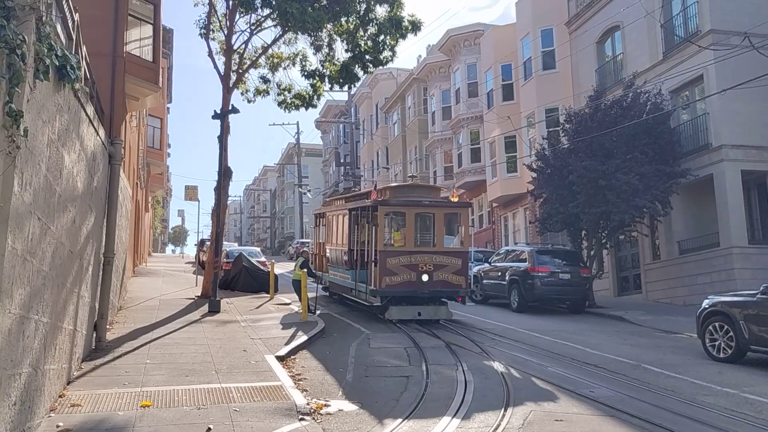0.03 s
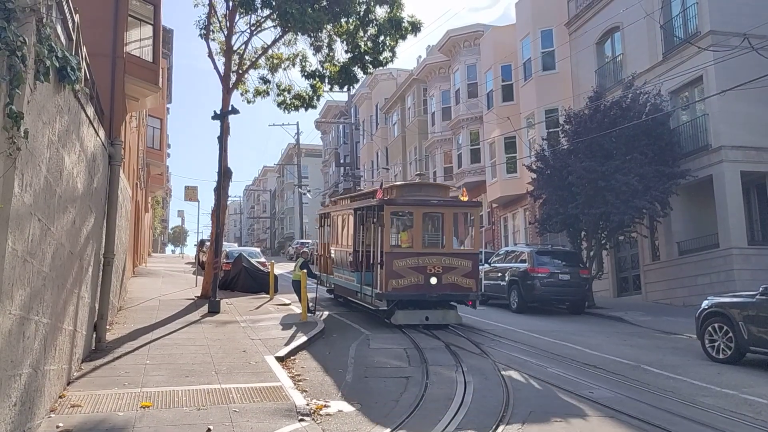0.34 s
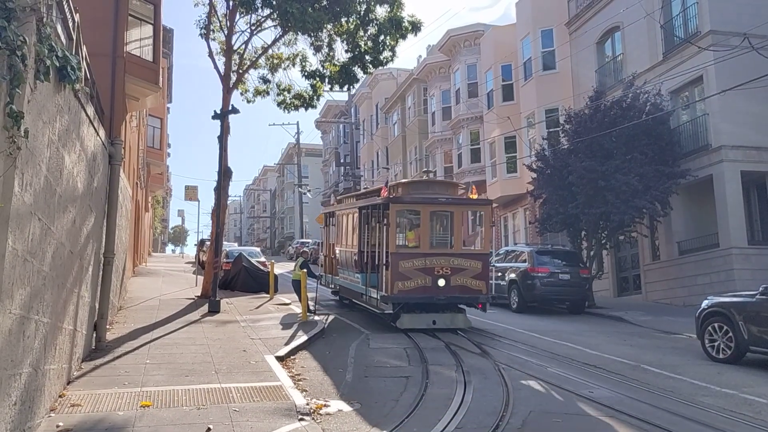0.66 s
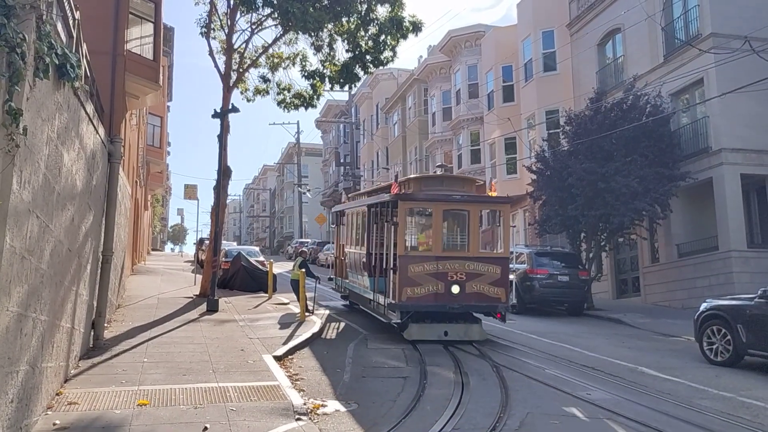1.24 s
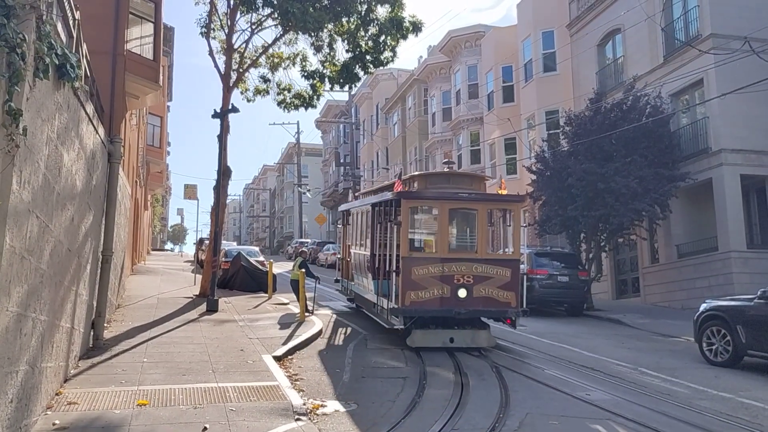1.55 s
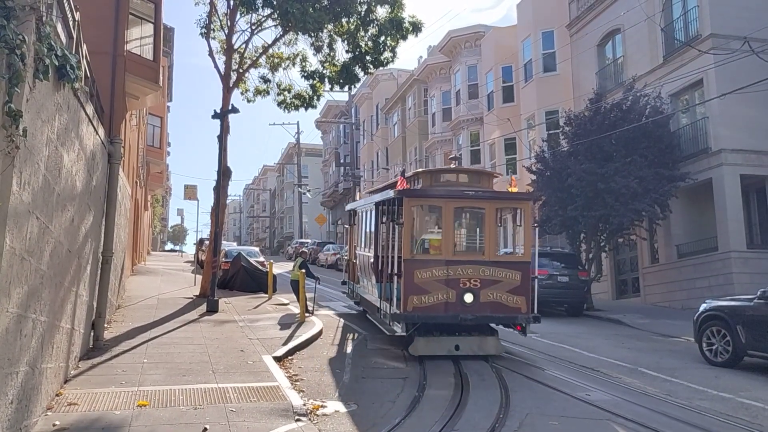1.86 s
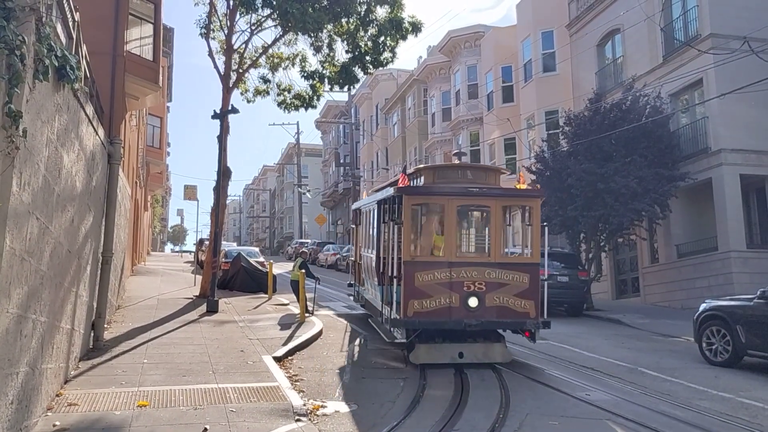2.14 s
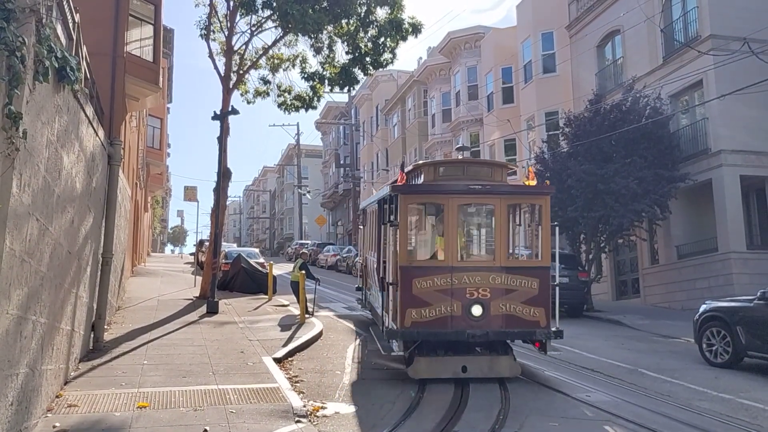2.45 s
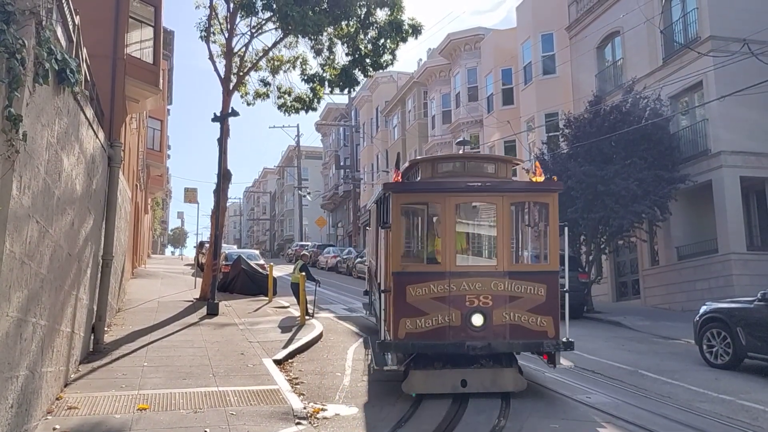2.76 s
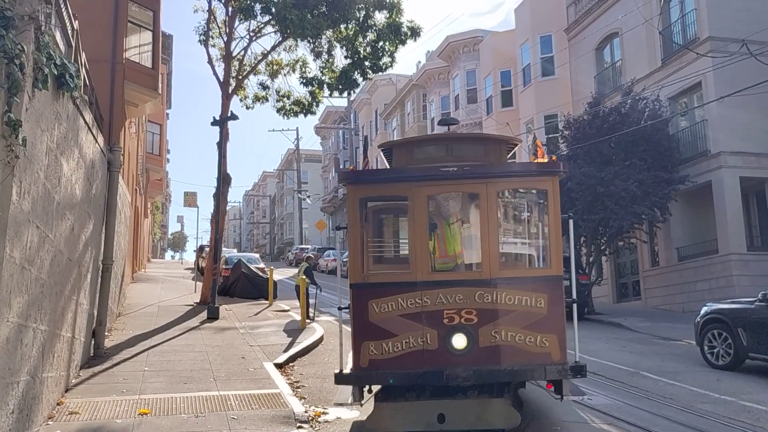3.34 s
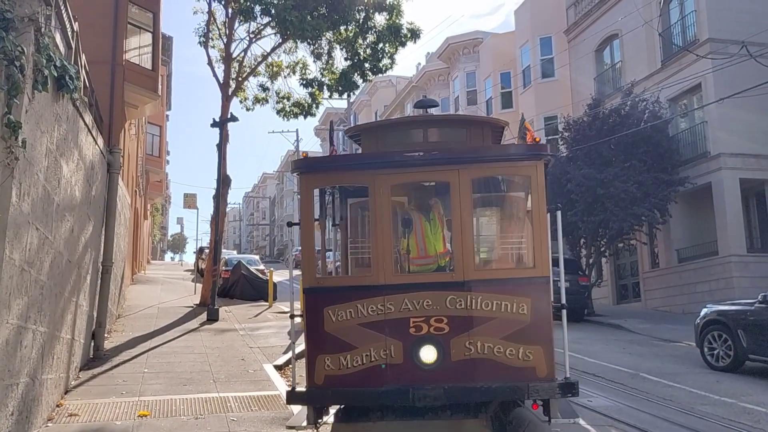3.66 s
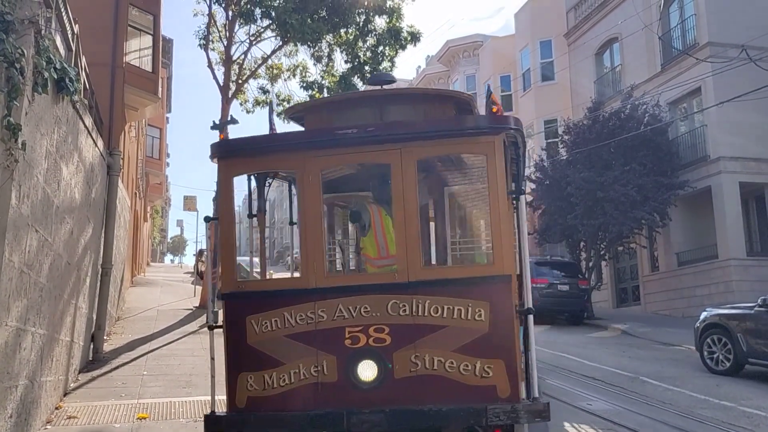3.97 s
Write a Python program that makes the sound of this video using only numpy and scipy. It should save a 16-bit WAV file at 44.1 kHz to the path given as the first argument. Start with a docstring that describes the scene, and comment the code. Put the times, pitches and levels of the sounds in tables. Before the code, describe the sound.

A cable car rolls toward the microphone on a street, over the fast ringing tick of its cable on the right. Dull wheel knocks and a growing rumble follow, with hissing scrape, a thin squeal and a final bright rush.

```python
"""A cable car rolls nearer down a city street while the haul cable runs in its slot just to the right.
At first the cable's strands strike a steel guide sixty times a second and make its modes ring.
From about one second the wheels knock over rail joints, and the car's rumble and roar swell.
After two seconds the striking turns into a steady scrape, the wooden body booms and the guide's
friction squeal grows. Last comes a bright rush of steel as the front wheels draw level."""
import sys
import numpy as np
from scipy import signal
from scipy.fft import rfft, irfft, next_fast_len
from scipy.io import wavfile
from scipy.ndimage import uniform_filter1d, minimum_filter1d, map_coordinates

SR = 44100
rng = np.random.default_rng(int(sys.argv[2]) if len(sys.argv) > 2 else 0)


def unload_audio(sound):
    """Save the sound as a 16-bit wav file, at the path given as the first command line argument."""
    columns = np.transpose(np.atleast_2d(sound))
    # keep every value between -1 and 1, then stretch to whole-number steps
    steps = np.round(np.clip(columns, -1, 1) * 32767)
    wavfile.write(sys.argv[1], SR, steps.astype(np.int16))


N = 176400


def amp(db):
    """Decibels to amplitude ratio."""
    return 10 ** (np.asarray(db) / 20)


def unit(x):
    """Normalisation to rms 1."""
    return x / np.sqrt(np.mean(x ** 2) + 1e-20)


def along(points, hz):
    """Interpolation of (frequency_hz, value) points on a logarithmic frequency axis."""
    knots_hz, values = np.transpose(points)
    return np.interp(np.log(hz + 1), np.log(knots_hz + 1), values)


def curves(rows):
    """Linear interpolation in time: one value per sample for each column after the first."""
    time_s, *columns = np.transpose(rows)
    return [np.interp(np.arange(N) / SR, time_s, column) for column in columns]


def wobble(rate_hz):
    """Smooth random modulation: a spline through rate_hz Gaussian knots a second."""
    knots = rng.standard_normal(int(N * rate_hz / SR) + 4)
    return map_coordinates(knots, [np.arange(N) * rate_hz / SR])


def filtered(x, response):
    """Linear filtering: the spectrum of x times a complex frequency response."""
    size = next_fast_len(N + SR // 4)
    return irfft(rfft(x, size) * response(np.fft.rfftfreq(size, 1 / SR)), size)[..., :N]


def resonate(force, modes, skirt_hz=260):
    """Modal superposition of (pitch_hz, width_hz, level_db) resonances, alternating in sign."""
    def response(f):
        total = 0
        for k, (hz, width, db) in enumerate(modes):
            skirt = np.exp(-((f - hz) / (skirt_hz + width / 2)) ** 2 / 2)
            mode = skirt / (1 + 2j * (f - hz) / width)
            total = total + (-1) ** k * amp(db) * mode / np.sqrt(np.mean(np.abs(mode) ** 2))
        return total
    return filtered(force, response)


def pulley_whine(pitch_hz=1047, width_hz=8.6, level_db=-60):
    """Narrow-band resonance: a randomly driven pulley whines faintly."""
    return resonate(rng.standard_normal(N), [(pitch_hz, width_hz, level_db)])


# Likeness of the car's sound at the two ears: frequency_hz, coherence
COHERENCE = [(60, 1), (150, 0.92), (300, 0.81), (550, 0.76), (1000, 0.45), (2500, 0.17)]
# Phase by which the left ear leads: frequency_hz, lead_rad
LEFT_LEAD = [(60, -1), (150, -0.08), (300, 0.5), (500, -0.26), (900, -2.07), (2000, -1), (4000, -4.5)]
# Level at the left ear over the right: frequency_hz, difference_db
LEFT_EXCESS = [(60, 3.5), (250, 2.8), (550, 4), (1000, -2.5), (2000, -10), (4000, -14.5)]

def car_noise(spectrum):
    """Interaural coherence, phase and level place stereo noise of rms 1 at the car."""
    def mid_and_side(hz):
        angle = np.arccos(np.clip(along(COHERENCE, hz), -1, 1)) / 2
        return amp(along(spectrum, hz)) * [np.cos(angle), np.sin(angle)]
    mid, side = filtered(rng.standard_normal((2, N)), mid_and_side)
    ears = np.array([[.5], [-.5]])
    place = lambda hz: amp(ears * along(LEFT_EXCESS, hz)) * np.exp(1j * ears * along(LEFT_LEAD, hz))
    return unit(filtered(np.array([mid + side, mid - side]), place))


# The car's approach: time_s, rumble_db, roar_db, rail_db
APPROACH = [(0, -38.5, -42, -49), (.5, -42, -38.5, -74), (1, -41, -34.5, -67), (1.2, -36, -31.5, -45),
            (1.62, -36, -32.5, -50.5), (1.9, -37.5, -28.5, -41), (2.1, -32.5, -29, -39.5),
            (2.4, -37, -23.5, -32), (2.62, -33.5, -26.5, -32), (2.78, -32, -22.5, -34.5),
            (3.05, -32, -25, -34), (3.3, -37, -27, -37), (3.6, -33.5, -28.5, -37),
            (3.88, -31.5, -23, -31.5), (3.97, -32, -20.5, -23.5), (4, -30.5, -23.5, -30)]
# Spectra of body rumble, wheel roar and rail rasp: frequency_hz, density_db
RUMBLE_SPECTRUM = [(20, -28), (35, -16), (55, 6.5), (80, 11), (120, 7), (170, -9), (300, -48.5)]
ROAR_SPECTRUM = [(70, -40), (130, -2.5), (170, -7), (205, 0), (260, -4), (340, -7.5), (430, -6),
                 (560, -5.5), (700, -11), (850, -14), (1200, -26), (2500, -38)]
RAIL_SPECTRUM = [(500, 7), (1000, -0.5), (1200, -2), (1500, 5.5), (2300, -1.5), (3200, -25), (4500, -34),
                 (8000, -60)]

def rolling(judder_db=1.02):
    """Rolling noise swells as the car nears; track roughness modulates the roar and the rasp."""
    rumble_db, roar_db, rail_db = curves(APPROACH)
    shake_db = judder_db * wobble(18)
    rumble = amp(rumble_db) * car_noise(RUMBLE_SPECTRUM)
    roar = amp(roar_db + shake_db) * car_noise(ROAR_SPECTRUM)
    rasp = amp(rail_db + shake_db / 2) * car_noise(RAIL_SPECTRUM)
    return rumble + roar + rasp


# Resonances of the wooden body: pitch_hz, width_hz, level_db
BODY_MODES = [(133.4, 17, -3.5), (204.8, 27, -0.5), (415, 8.1, -5)]
# Envelope of their boom: time_s, level_db
BOOM_LEVELS = [(0, -54), (1.5, -45.5), (1.95, -41), (2.2, -32.5), (2.45, -25), (2.6, -31), (3.1, -29.5),
               (3.5, -33), (4, -32)]

def body_boom():
    """Forced vibration: the wooden body booms, swelling most between two and two and a half seconds."""
    level_db, = curves(BOOM_LEVELS)
    return amp(level_db) * unit(resonate(rng.standard_normal(N), BODY_MODES))


# The front wheels coming alongside: time_s, level_db
RUSH_LEVELS = [(3.2, -54), (3.65, -35), (3.92, -34), (3.95, -21.5), (4, -20)]
# Spectrum of their rush: frequency_hz, density_db
RUSH_SPECTRUM = [(250, -19), (500, 8.5), (780, 8.5), (1200, -9.5), (2500, -3), (4000, -13.5), (6000, -21),
                 (9000, -18)]

def wheel_rush():
    """Rolling contact of steel on steel radiates a bright rush as the front wheels draw level."""
    level_db, = curves(RUSH_LEVELS)
    return amp(level_db) * car_noise(RUSH_SPECTRUM)


# Wheels meeting rail joints: start_s, level_db, t60_s
JOINT_IMPACTS = [(1.11, -34, 0.45), (1.691, -28.5, 0.48), (1.984, -17, 0.42), (2.175, -8, 0.22),
                 (2.357, -17, 0.19), (2.429, -13, 0.28), (2.68, -15, 0.23), (2.734, -17, 0.22)]
# Spectrum of a knock: frequency_hz, density_db
KNOCK_SPECTRUM = [(50, -36), (130, -13), (200, 5.5), (290, -16.5), (440, 1.5), (600, -4.5), (800, -12),
                  (1200, -25), (2200, -25.5), (4000, -40.5), (9000, -72)]

def joint_knocks(attack_s=.0028):
    """Impact and damping: each joint starts a dull, exponentially dying clatter of truck and body."""
    envelope = np.zeros(N)
    for start_s, level_db, t60_s in JOINT_IMPACTS:
        age_s = np.maximum(np.arange(N) / SR - start_s, 0)
        envelope += amp(level_db - 60 * age_s / t60_s) * (1 - np.exp(-age_s / attack_s))
    return envelope * car_noise(KNOCK_SPECTRUM)


# Stuttering envelope of the squeal: time_s, level_db
SQUEAL_LEVELS = [(0.0, -51.5), (1.05, -49), (1.12, -60), (1.16, -48), (1.29, -56.5), (1.69, -41.5),
                 (1.77, -48), (1.86, -39), (2.33, -45.5), (2.67, -34.5), (2.71, -49), (2.82, -35.5),
                 (2.87, -43), (3.29, -37), (3.32, -49), (3.38, -34.5), (3.42, -46.5), (4.0, -35.5)]

def guide_squeal(pitch_hz=2630, drift_hz=8.33, waver_db=3, rasp_db=3.5):
    """Friction-induced vibration: the guide's lowest mode sings, unsteady in pitch and level."""
    level_db, = curves(SQUEAL_LEVELS)
    phase = 2 * np.pi * np.cumsum(pitch_hz + drift_hz * wobble(25.15)) / SR
    def ear(gain_db):
        flutter_db = waver_db * wobble(35) + rasp_db * wobble(130)
        return amp(level_db + gain_db + flutter_db) * np.sqrt(2) * np.sin(phase + wobble(8))
    return np.array([ear(gain_db=1), ear(gain_db=3)])


STRAND_HZ, FIRST_STRIKE_S = 59.95, .0147
GRAZE_RISE_S, GRAZE_FADE_S = .0008, .0031  # time constants of a strand's contact
# Strands that hit hard: time_s
HARD_STRANDS = [0.048, .115, .198, .315, .349, .398, .482, .516, .549, .598, .700, .716, .782, .815, .915,
                .932, .965, 1.031, 1.048, 1.100, 1.215, 1.248, 1.298, 1.365, 1.398, 1.499, 1.582, 1.615,
                1.749, 1.782, 1.832, 1.900, 2.000, 2.033, 2.083]

def strand_strikes(hard_db=4.5, scatter_db=2, jitter_s=.0003, graze_db=-.5, tick_fade_s=.009):
    """Impulse train: each strand gives an uneven blow with a brief graze, and a dry tick."""
    times_s = np.arange(FIRST_STRIKE_S, N / SR - .005, 1 / STRAND_HZ)
    force_spread, time_spread = rng.standard_normal((len(times_s), 2)).T
    is_hard = np.abs(times_s[:, None] - np.array(HARD_STRANDS)).min(axis=1) < .5 / STRAND_HZ
    forces = amp(np.where(is_hard, hard_db, scatter_db * np.minimum(force_spread, 1)))
    onsets = np.clip((times_s + jitter_s * time_spread) * SR, 0, N - 1).astype(int)
    impulses = np.bincount(onsets, forces, N)
    decay = lambda x, tau_s: signal.lfilter([1], [1, -np.exp(-1 / (tau_s * SR))], x)
    burst = lambda fade_s: unit(decay(decay(impulses, GRAZE_RISE_S), fade_s) * rng.standard_normal(N))
    blows = unit(unit(impulses) + amp(graze_db) * burst(GRAZE_FADE_S))
    return blows, burst(tick_fade_s)


def strand_scrape(steady_db=-4, waver_db=2, grit_db=2):
    """Sliding friction: noise follows the contact pressure, which pulses with each passing strand."""
    strands_passed = (np.arange(N) / SR - FIRST_STRIKE_S) * STRAND_HZ
    pulse = np.exp(-(strands_passed % 1) / (STRAND_HZ * GRAZE_FADE_S))
    friction = rng.standard_normal(N) * (amp(steady_db) + pulse)
    return unit(friction * amp(waver_db * wobble(6.6) + grit_db * wobble(150)))


def street_smear(x, t60_s=.072):
    """Reverberation: the street spreads a sound into a short, exponentially decaying tail."""
    age_s = np.arange(SR // 4) / SR
    tail = rng.standard_normal(len(age_s)) * amp(-60 * age_s / t60_s)
    return signal.fftconvolve(x, tail / np.linalg.norm(tail))[:N]


# Spectra of the striking tick and the scraping hiss: frequency_hz, density_db
TICK_SPECTRUM = [(2000, -16.5), (3300, -10), (4200, -21.5), (4800, -1.5), (6300, -8), (7600, -3.5),
                 (8500, -20.5), (9600, -9.5), (11200, -9), (13000, -2), (14300, -10), (15600, -8.5)]
HISS_SPECTRUM = [(1500, -5), (3500, -7), (5000, -30), (6400, -10), (7600, 2.5), (8600, 4), (11000, -5),
                 (13000, 9), (15700, -0.5)]

def contact_rasp(ticks, scrape, strike_gain, scrape_gain, tick_db=-34.5, hiss_db=-32.5, left_db=-4):
    """Broadband contact noise: ticks and hiss reach the right ear direct, the left weaker and smeared."""
    coloured = lambda x, spectrum: unit(filtered(x, lambda hz: amp(along(spectrum, hz))))
    rasp = amp(tick_db) * strike_gain * coloured(ticks, TICK_SPECTRUM)
    rasp += amp(hiss_db) * scrape_gain * coloured(scrape, HISS_SPECTRUM)
    return np.array([amp(left_db) * street_smear(rasp), rasp])


# Modes of the steel guide, one entry each: pitch_hz; width_hz
MODE_PITCH_HZ = [3600, 4548, 5980, 6758, 6930, 9000, 9296, 10498, 12096, 12300, 13600, 14778, 14960, 15198]
MODE_WIDTH_HZ = [130, 11.4, 220, 18.5, 200, 220, 14.2, 11, 13.8, 150, 400, 15, 120, 12]
# Their strength at the right ear, struck and scraped, and at the left ear: level_db
MODE_STRUCK_DB = [-46, -31, -36.5, -11.5, -24, -60, -38, -46, -31.5, -43, -51, -35.5, -44, -34.5]
MODE_SCRAPED_DB = [-48, -37, -53, -17.5, -28, -43, -23, -55, -26, -59, -47, -28, -44, -27.5]
MODE_LEFT_DB = [-90, -34, -41, -37, -35.5, -70, -43, -51, -35, -47, -56, -42, -56, -43]

def guide_ring(blows, scrape, strike_gain, scrape_gain, left_scrape=.5, left_direct=.35, lag_s=.00059):
    """Modal resonance: blows and scraping ring the guide; the left ear hears it late and mostly diffuse."""
    ring = lambda force, levels_db: resonate(force, zip(MODE_PITCH_HZ, MODE_WIDTH_HZ, levels_db))
    striking, scraping = strike_gain * blows, scrape_gain * scrape
    right = ring(striking, MODE_STRUCK_DB) + ring(scraping, MODE_SCRAPED_DB)
    diffuse = np.hypot(strike_gain, left_scrape * scrape_gain) * rng.standard_normal(N)
    direct = np.pad(striking + left_scrape * scraping, (round(lag_s * SR), 0))[:N]
    left = ring(left_direct * direct + np.sqrt(1 - left_direct ** 2) * diffuse, MODE_LEFT_DB)
    return np.array([left, right])


# Contact of cable and guide: time_s, striking_db, scraping_db
CONTACT_LEVELS = [(0, 1.5, -11.5), (1.4, -1.5, -18), (1.95, 0.1, -14), (2.15, -2.5, -2.5),
                  (2.33, -5.5, -7.5), (2.45, -5, 4.5), (2.75, -7.5, 1), (3.05, -11.5, 0), (3.5, -9, 0),
                  (4, -17, -0.5)]

def haul_cable():
    """Contact excitation: the strands drive the guide, first mainly by impact, then by friction."""
    gains = amp(curves(CONTACT_LEVELS))
    blows, ticks = strand_strikes()
    scrape = strand_scrape()
    return contact_rasp(ticks, scrape, *gains) + guide_ring(blows, scrape, *gains)


def scene():
    """Superposition of the running cable and the approaching car."""
    cableway = haul_cable() + guide_squeal() + pulley_whine()
    return cableway + rolling() + body_boom() + wheel_rush() + joint_knocks()


def record(dry, ceiling=.98, window_s=.006, top_hz=15750):
    """Peak limiting and band limiting: the gain dips at each overload, then the top treble is cut."""
    size = int(window_s * SR)
    needed_gain = ceiling / np.maximum(np.abs(dry).max(axis=0), ceiling)
    gain = uniform_filter1d(minimum_filter1d(needed_gain, size), size)
    return filtered(dry * gain, lambda hz: hz < top_hz)


dry = scene()
out = record(dry)
unload_audio(out)
```